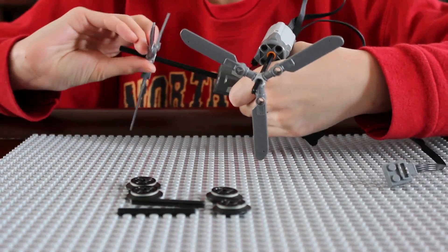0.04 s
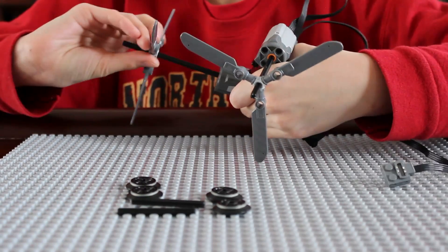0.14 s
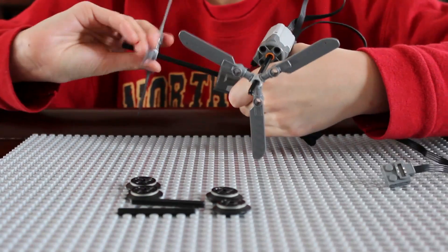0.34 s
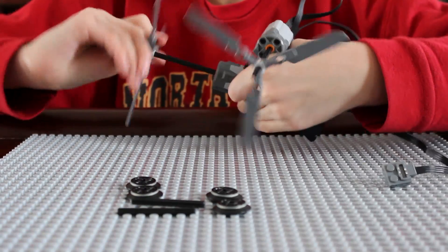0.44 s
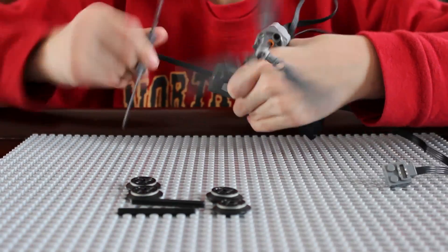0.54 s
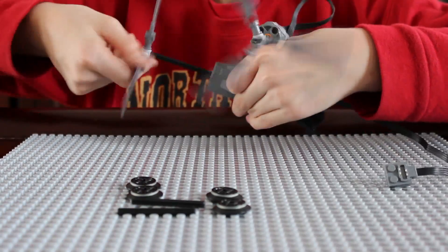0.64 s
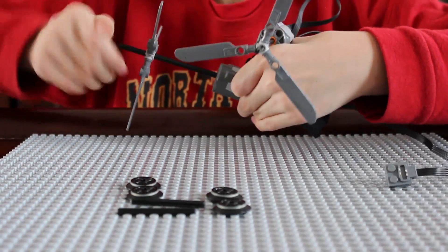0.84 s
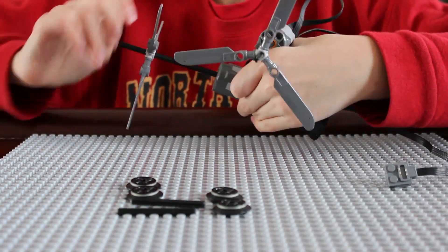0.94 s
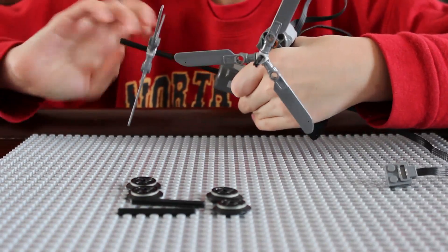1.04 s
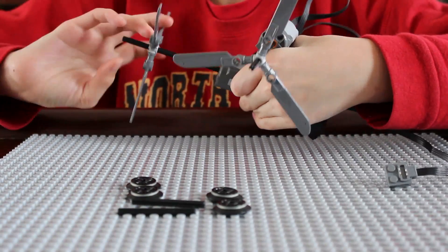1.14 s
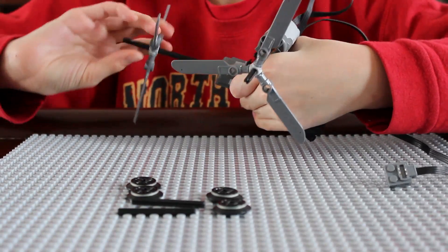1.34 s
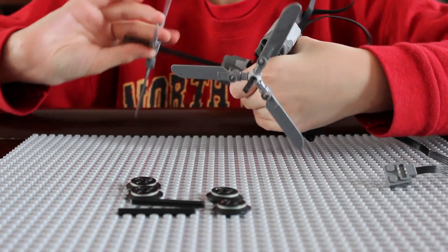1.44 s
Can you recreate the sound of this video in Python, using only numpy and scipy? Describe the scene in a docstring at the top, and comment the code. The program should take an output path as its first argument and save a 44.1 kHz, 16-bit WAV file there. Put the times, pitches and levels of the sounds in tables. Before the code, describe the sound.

A brief rasping zip spins a toy propeller, its plastic parts clattering just before.

```python
"""A fan hums in a quiet room. At 0.2 s a plastic toy propeller on a small motor is gripped:
its loose parts clatter and the frame bumps into the hand. From 0.43 s a strip is pulled through
the hub in tiny jerks, rasping louder and brighter as it spins the blades, which flutter briefly
near 0.68 s. At 0.74 s the pull ends with a knock, and the parts tick as they settle."""
import sys
import numpy as np
from scipy import signal
from scipy.fft import rfft, irfft
from scipy.io import wavfile
from scipy.ndimage import uniform_filter1d

SR = 44100
rng = np.random.default_rng(int(sys.argv[2]) if len(sys.argv) > 2 else 0)


def to_wav(s):
    """Save 16-bit WAV."""
    ch = np.atleast_2d(s).T  # columns
    pcm = np.round(np.clip(ch, -1, 1) * 32767)  # PCM
    wavfile.write(sys.argv[1], SR, pcm.astype(np.int16))


N = 66150
T = np.arange(N) / SR
FREQS, FILTER_FREQS = np.fft.rfftfreq(N, 1 / SR), np.fft.rfftfreq(4096, 1 / SR)


def amp(db):
    """Turns decibels into a gain."""
    return 10 ** (np.asarray(db) / 20)


def unit(x):
    """Scales a signal to an average (rms) size of 1."""
    return x / np.sqrt(np.mean(abs(x) ** 2) + 1e-20)


def read(points, hz):
    """Reads between a table's rows on a log-frequency axis."""
    f, value = np.transpose(points)
    return np.interp(np.log(hz + 1), np.log(f + 1), value)


def add(mix, start_s, sound):
    """Mixes a sound in at its start time."""
    part = mix[round(start_s * SR):][:len(sound)]
    part += sound[:len(part)]


def rolloff(hz, edge_hz, steepness):
    """A gain that is 1 at zero and a half at the edge."""
    return 1 / (1 + (hz / edge_hz) ** steepness)


def noise(gains):
    """Noise of size 1, shaped by a gain for each frequency."""
    return unit(irfft(rfft(rng.standard_normal(N)) * gains, N))


def tone_filter(db):
    """A filter of energy 1 with this tone colour; it never sounds before its input."""
    log_gain = np.log(amp(np.r_[db, db[-2:0:-1]]))
    response = np.fft.ifft(np.exp(np.conj(signal.hilbert(log_gain)))).real
    return response / np.linalg.norm(response)


def through(x, response):
    """Filters a sound and keeps its length."""
    return signal.fftconvolve(x, response)[:len(x)]


def fade(fade_s):
    """Dies away by 60 dB in fade_s seconds."""
    return np.exp(-np.log(1000) * T / fade_s)


def burst(fade_s, rise_s):
    """A quickly dying puff of noise with energy 1."""
    puff = rng.choice([-1., 1.], N) * fade(fade_s) * (1 - np.exp(-T / rise_s))
    return puff / np.linalg.norm(puff)


# how long the room echoes: f/Hz, fade time/s
ECHO_TIMES = [(150, 0.22), (500, 0.3), (1400, 0.25), (3500, .24), (8000, 0.26), (15000, 0.21)]

def room(x, echo_db, delay_s=0.0051):
    """Adds echoes from the walls, each pitch dying at its own speed."""
    echoes = rng.choice([-1., 1.], N) * (rng.random(N) < .1)
    hz, t, spectrum = signal.stft(echoes, SR, nperseg=256)
    spectrum *= np.exp(-np.log(1000) * t / read(ECHO_TIMES, hz)[:, None])
    tail = signal.istft(spectrum, SR, nperseg=256)[1][:N]
    tail *= np.clip(T / delay_s - 1, 0, 1)
    return x + amp(echo_db) * through(x, tail / np.linalg.norm(tail))


# tone colour of the room's air: f/Hz, relative level/dB
AIR_COLOUR = [(20, -2.5), (32, -21), (70, -4.5), (126, -8.5), (233, -4.5), (300, -6.5), (443, -6),
              (560, -8.5), (820, -9.5), (1000, -11.5), (1450, -15), (3000, -17.5), (6000, -22),
              (10000, -25.5), (15800, -25)]

def room_air():
    """A steady hush of air over a low rumble."""
    hush = amp(-53) * noise(amp(read(AIR_COLOUR, FREQS)))
    rumble = amp(-64) * noise(rolloff(FREQS, 24, 4))
    return hush + rumble


# the fan's tones: f/Hz, level/dB
FAN_TONES = [(175, -68.5), (210, -67), (262, -77), (294, -63.5), (313, -66.5), (365, -67), (417, -67.5),
             (523, -68.5), (626, -69.5), (945, -73.5)]

def fan_hum(waver_depth=0.53, waver_hz=7.5):
    """A fan hums in several tones, each wavering at random."""
    out = np.zeros(N)
    for hz, db in FAN_TONES:
        a, b = (noise(rolloff(FREQS, waver_hz, 2)) for _ in range(2))
        waver = 1 + waver_depth * (a + 1j * b)  # moves both loudness and pitch
        tone = np.exp(2j * np.pi * (hz * T + rng.random()))
        out += amp(db) * unit((waver * tone).real)
    return out


def blade_flutter(peak_s=.675, swell_s=.04, hz=217, width_hz=125):
    """The blades beat the air for a moment at their fastest."""
    air = noise(rolloff(FREQS - hz, width_hz / 2, 4))
    return amp(-54) * air * np.exp(-((T - peak_s) / swell_s) ** 2)


# tone colour of the bump: f/Hz, relative level/dB
BUMP_COLOUR = [(25, -20), (65, 2), (130, 0.5), (250, -13), (600, -40), (3000, -81)]

def hand_bump(start_s=.245):
    """The frame is pushed into the hand: a dull, low bump."""
    out = np.zeros(N)
    push = rng.standard_normal(N) * fade(0.52)
    add(out, start_s, amp(-50) * through(push, tone_filter(read(BUMP_COLOUR, FILTER_FREQS))))
    return out


# knocks of the plastic parts: t/s, relative level/dB, extra bass/dB, extra treble/dB
PART_KNOCKS = [(0.195, -26, 4, 7), (0.1994, -5.5, -11, -12), (0.2025, -3.5, -4.5, -3),
               (.2078, -7.5, -15, -16), (0.2114, 2, -9.5, 6), (0.217, -5, 1, 15.5), (.2188, 2, -4.5, -12),
               (.226, -8.5, 3, 10), (0.2331, -7.5, -9, 8), (0.2351, -4, 5, -17), (0.2454, -13, 9, -6),
               (0.4302, -19, -3, -29), (0.74, -16.5, -11, 4), (.7442, -14, -0.5, 0)]
# tone colour of a clack: f/Hz, relative level/dB
CLACK_COLOUR = [(40, -30), (150, -15), (330, -4.5), (600, -5.5), (850, -3), (1150, 1.5), (1400, -1.5),
                (1650, -5), (2100, 3), (3000, -3), (3700, -11.5), (4700, -15.5), (7000, -32.5),
                (15000, -48)]
# ringing notes of blades and frame: f/Hz, relative level/dB, fade time/s
RING_NOTES = [(425, 4, 0.24), (572, 0.5, 0.15), (596, -2, 0.24), (712, 11, 0.14), (796, 4, 0.09),
              (959, -1, 0.22), (995, -4, 0.38), (1097, 10, 0.081), (1390, 1.5, 0.096), (1790, -22, 0.36),
              (2100, -23, 0.16), (1990, 12.5, 0.052), (2323, -3, 0.11), (2760, 14.5, 0.035)]

def knocks(bass_hz=830, treble_hz=5750, rise_s=0.00045):
    """Loose parts hit each other: a short clack with a shorter, bright snap, and the blades ring on."""
    out = np.zeros(N)
    body = tone_filter(read(CLACK_COLOUR, FILTER_FREQS))
    bass, treble = rolloff(FILTER_FREQS, bass_hz, 4), 1 - rolloff(FILTER_FREQS, treble_hz, 6)
    lowpass, highpass = (signal.butter(3, treble_hz, kind, fs=SR) for kind in ("low", "high"))
    ring = sum((-1) ** k * amp(db - 45.5) * fade(fade_s) * np.sin(2 * np.pi * hz * T)
               for k, (hz, db, fade_s) in enumerate(RING_NOTES))
    for start_s, db, bass_db, treble_db in PART_KNOCKS:
        dull = signal.lfilter(*lowpass, burst(0.023, rise_s))
        snap = signal.lfilter(*highpass, burst(0.011, rise_s))
        clack = amp(-0.5) * through(dull + 0.91 * snap, body)
        boost_db = bass_db * bass + treble_db * treble
        boost = tone_filter(boost_db) * np.sqrt(np.mean(amp(boost_db) ** 2))
        add(out, start_s, amp(db) * through(clack + ring, boost))
    return room(out, echo_db=-8)


# tone colour of strip and hub: f/Hz, relative level/dB
HUB_COLOUR = [(80, -37), (400, -32), (1000, -10.5), (1400, -3.5), (1900, -0.5), (2800, 0.5), (4600, -0.5),
              (6100, -4), (7700, -5.5), (8800, -10.5), (12500, -16), (15500, -16)]
# pitches where they ring: f/Hz, width/Hz, boost/dB
HUB_PEAKS = [(3590, 200, 7.3), (3930, 350, 6), (5400, 570, 2.7), (7010, 1100, 5.7), (10660, 770, 8.7)]

def hub_body():
    """The strip and hub ring at a few pitches, colouring every scrape and tick."""
    peaks_db = sum(db * rolloff(FILTER_FREQS - hz, width / 2, 2) for hz, width, db in HUB_PEAKS)
    return tone_filter(read(HUB_COLOUR, FILTER_FREQS) + peaks_db)


# ticks of the hub: t/s, relative level/dB, extra treble/dB
HUB_TICKS = [(.47, -15, -18), (0.501, -17, 2), (0.539, -9, 3), (0.677, -10, -5), (0.7, -7, -2),
             (.7235, -5, 2), (0.732, 2, 10), (0.863, -17, -16), (0.891, -15.5, -10), (0.913, -19.5, -14),
             (1.1807, -18, 1)]

def hub_ticks(treble_hz=7500):
    """The hub ticks sharply during the pull and as the parts settle."""
    out, body = np.zeros(N), hub_body()
    treble = 1 - rolloff(FILTER_FREQS, treble_hz, 6)
    for start_s, db, treble_db in HUB_TICKS:
        tick = through(burst(fade_s=.024, rise_s=0.0011), body)
        add(out, start_s, amp(db - 16) * through(tick, tone_filter(treble_db * treble)))
    return out


# how hard the strip is pulled: t/s, relative level/dB
PULL_FORCE = [(.43, -42), (.439, -9.5), (.449, -11), (.456, -7.5), (.48, -5.5), (.52, -5), (.565, -3),
              (.625, -2), (.665, 0.76), (.698, 3), (.718, 0.5), (.738, 0), (.756, -2.5), (.775, -10),
              (.83, -40)]
# the highest treble, fading as the strip runs out: t/s, relative level/dB
TOP_FADE = [(.44, 6.5), (.55, 3.5), (.68, 4), (.72, -2.5), (.77, -9.5)]

def strip_rasp(base_slips_per_s=1100, grip_db=-9, hiss=1.1):
    """The strip slips through the hub in uneven, scraping jerks; a harder pull makes them faster."""
    pull_db = np.interp(T, *np.transpose(PULL_FORCE), left=-100, right=-100)
    force_db = np.maximum(pull_db, grip_db)
    slips_per_s = base_slips_per_s * np.exp(0.07 * force_db)
    jitter = np.exp(.3 * unit(uniform_filter1d(rng.standard_normal(N), size=40)))
    slips = np.diff(np.floor(np.cumsum(slips_per_s * jitter) / SR), prepend=0)
    strengths = amp(2 * rng.standard_normal(N))
    jerks = unit(through(slips * strengths, fade(.0022)))
    scrapes = unit((jerks + hiss) * rng.choice([-1., 1.], N))
    flicker = amp(.8 * noise(rolloff(FREQS, 250, 2)))
    spectrum = rfft(through(scrapes * flicker, hub_body()))
    # pulling harder lifts the highs more than the lows
    low, top = rolloff(FREQS, 2600, 6), 1 - rolloff(FREQS, 9000, 8)
    top_db = 0.91 * force_db + np.interp(T, *np.transpose(TOP_FADE))
    bands = [(low, 0.24 * force_db), (1 - low - top, force_db), (top, top_db)]
    rasp = sum(irfft(spectrum * share, N) * amp(db) for share, db in bands)
    # below grip_db the strip loses its grip and all bands fade alike
    return amp(-42.5 + pull_db - force_db) * rasp


def scene():
    """The toy and the room, heard at one spot."""
    toy = knocks() + hand_bump() + room(strip_rasp() + hub_ticks(), echo_db=-4.5) + blade_flutter()
    return (toy + room_air() + fan_hum())[None]


def record(dry, cutoff_hz=15900):
    """Cuts away the very highest treble."""
    lowpass = signal.firwin(511, cutoff_hz, window=("kaiser", 8), fs=SR)
    return signal.oaconvolve(dry, lowpass[None], "same")


dry = scene()
out = record(dry)
to_wav(out)
```